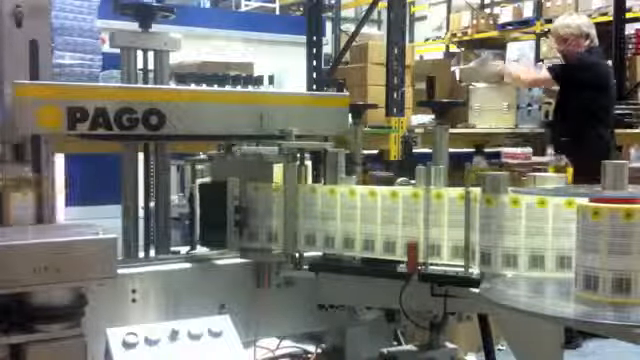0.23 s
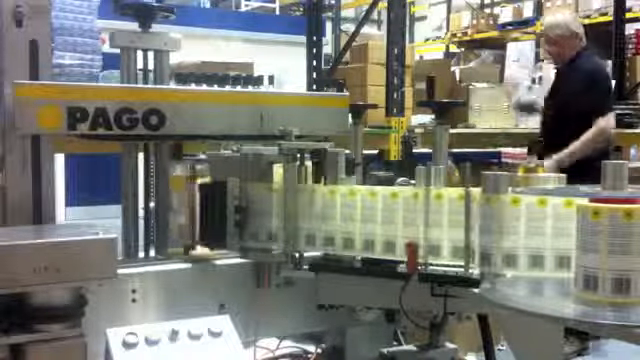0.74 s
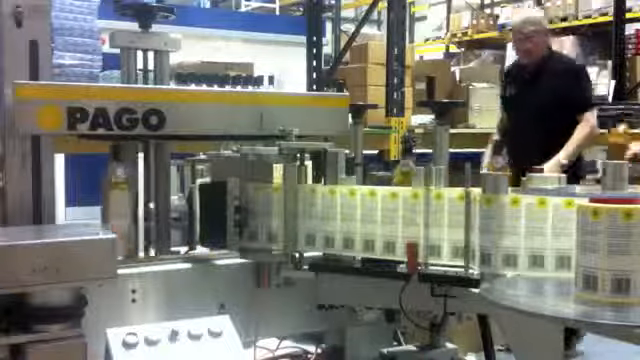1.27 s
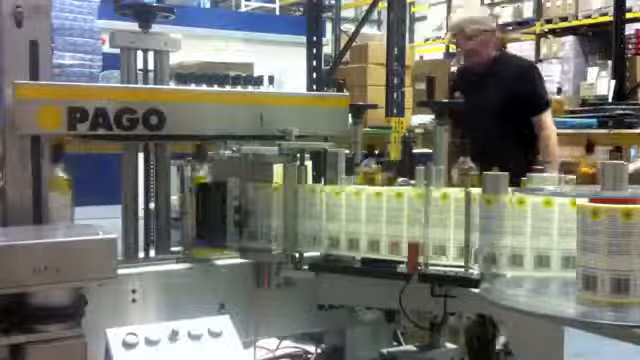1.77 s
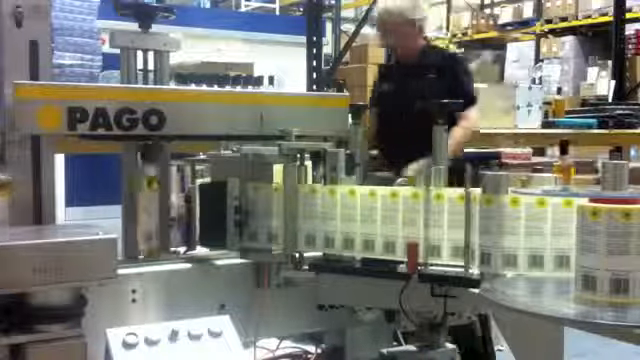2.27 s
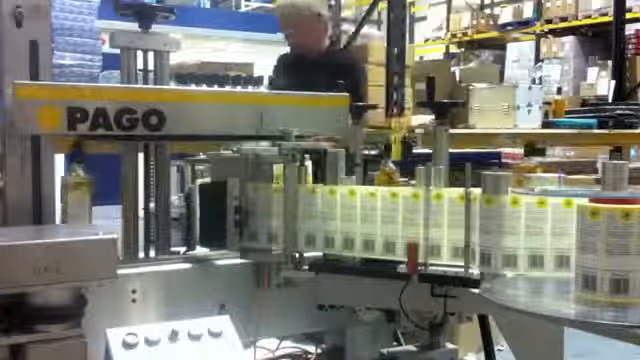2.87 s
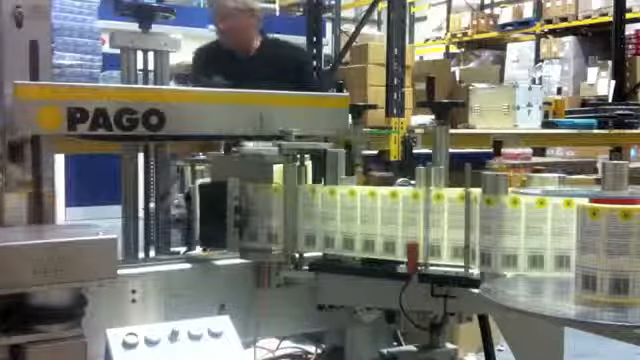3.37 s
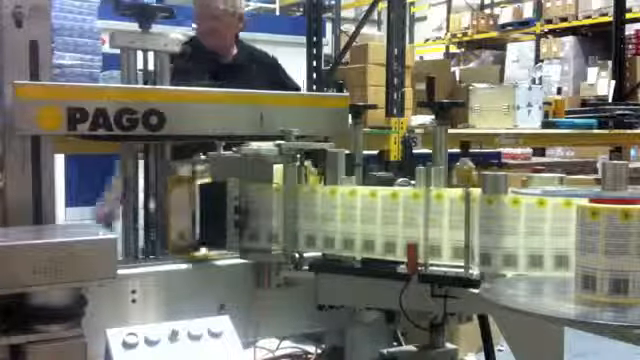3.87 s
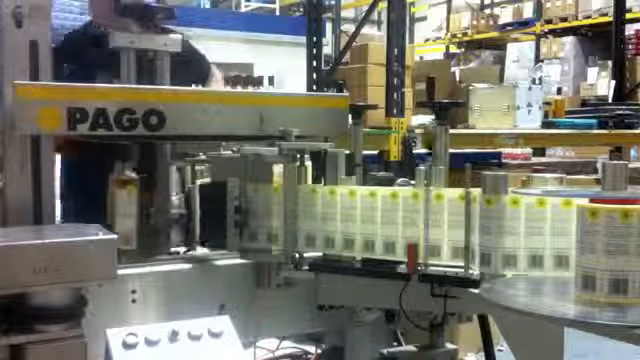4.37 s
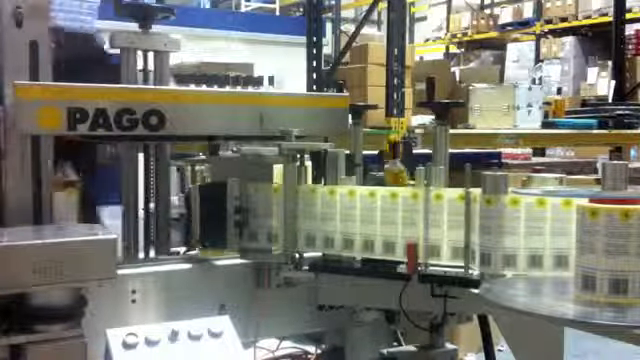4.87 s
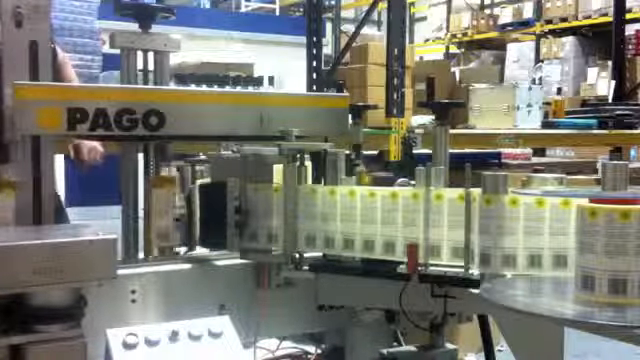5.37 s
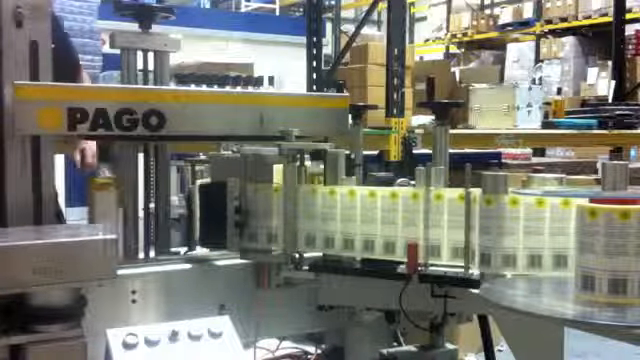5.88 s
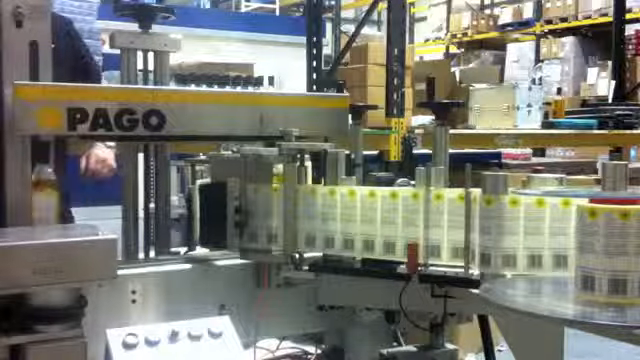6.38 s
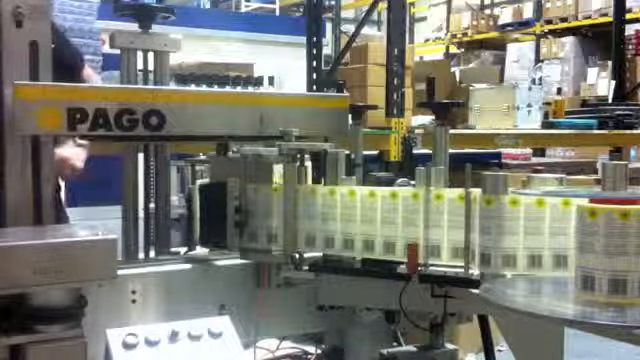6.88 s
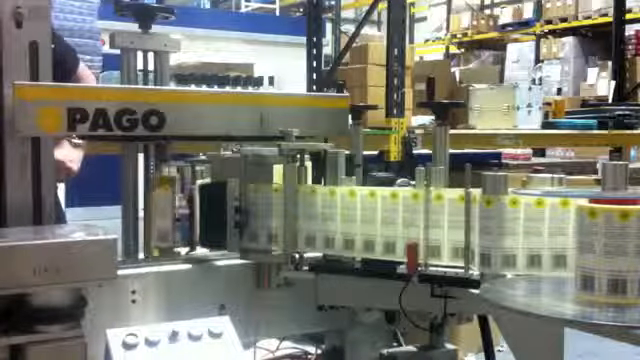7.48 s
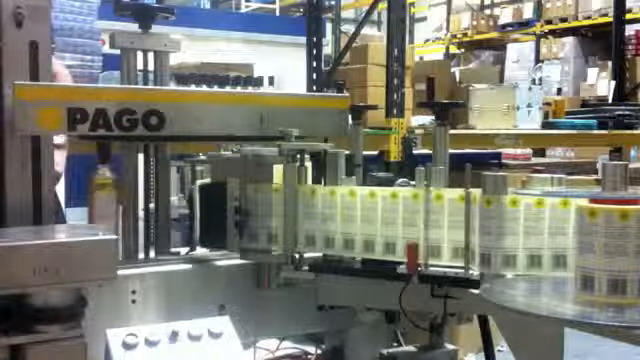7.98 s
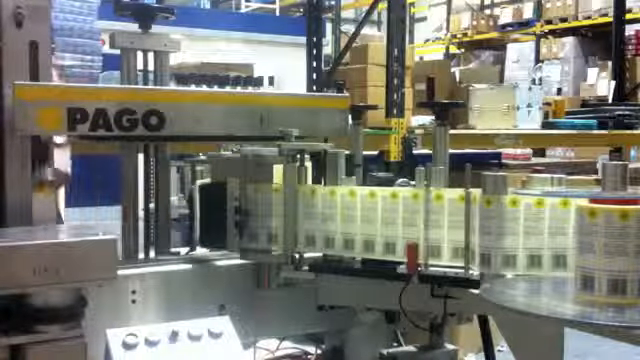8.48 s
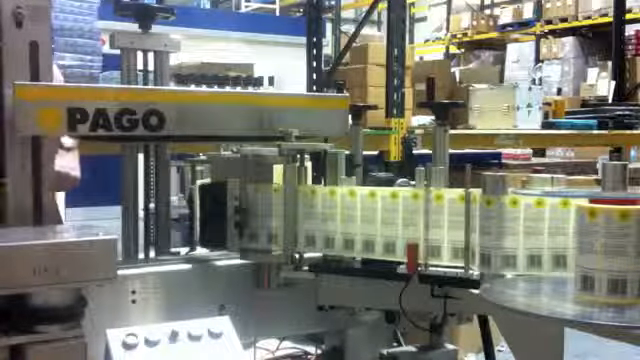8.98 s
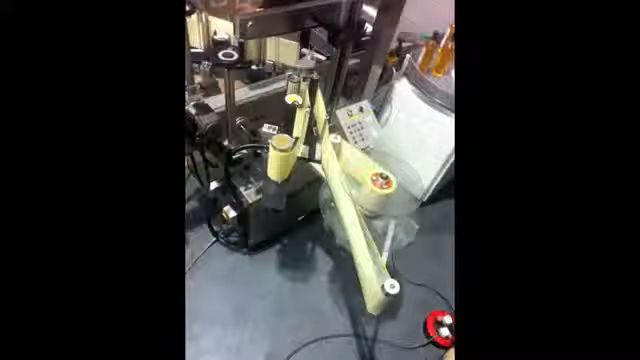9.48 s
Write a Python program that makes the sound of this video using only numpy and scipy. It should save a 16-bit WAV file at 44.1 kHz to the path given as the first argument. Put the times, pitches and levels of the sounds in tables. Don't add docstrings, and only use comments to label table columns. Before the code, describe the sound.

A steady low motor hum and soft machine murmur fill a large hall with short echoes. Near the microphone, glass bottles travel on a chain conveyor, with faint ticks several times a second and brief papery hisses as labels feed. A bottle knocks in loudly around 0.4 s, with clinks following; a dry, bright knock comes at 1.5 s, then a rattling flurry to about 2.2 s. From 2.2 to 5 s it is sparser: light clinks, a ringing knock at 3.3 s, a thump at 3.8 s, a small sharp crack at 4.35 s. From 5.3 s touches gather, with a sharp glass snap at 5.9 s and the hardest knock at 6.5 s. Dull taps and thumps mix in. From 7.4 s, and especially 7.8 to 9.1 s, bottles are moved close by in dense, bright, ringing clatter. A quick fade at about 9.15 s leaves silence.

```python
import sys
import numpy as np
from scipy import signal
from scipy.io import wavfile

SR = 44100
rng = np.random.default_rng(int(sys.argv[2]) if len(sys.argv) > 2 else 0)


def store_pcm(level_fs):
    pcm = np.round(np.clip(level_fs, -1, 1) * 32767).astype(np.int16)
    wavfile.write(sys.argv[1], SR, np.atleast_2d(pcm).T)


def ratio_of_db(decibels):
    return 10 ** (np.asarray(decibels, float) / 20)


N = 429074
FADE_START_S, FADE_END_S = 9.13, 9.182

# height_s, length_s, sliding_db, glass_rattle_db
SHOVES = [(0.033, 0.11, -42, -42), (0.312, 0.35, -42, -42.5), (0.552, 0.18, -43, -39),
          (0.727, 0.24, -35, -38), (0.954, 0.2, -54.5, -44), (1.334, 0.38, -43.5, -47),
          (1.611, 0.16, -39, -29), (1.867, 0.23, -30.5, -26.5), (2.18, 0.12, -39.5, -59),
          (2.538, 0.11, -38, -40), (3.37, 0.18, -36, -35.5), (3.913, 0.35, -37, -41.5),
          (4.446, 0.21, -38, -36.5), (5.188, 0.37, -37, -43), (5.694, 0.22, -41, -36.5),
          (5.92, 0.12, -24.5, -23), (6.097, 0.49, -32.5, -30.5), (6.288, 0.23, -28.5, -28),
          (6.942, 0.85, -40.5, -36), (7.302, 0.23, -30, -30), (7.484, 0.09, -39.5, -26.5),
          (7.594, 0.086, -34.5, -61.5), (7.841, 0.081, -41, -25), (8.034, 0.15, -32, -19),
          (8.43, 0.47, -38.5, -31), (8.618, 0.34, -33, -31), (9.06, 0.12, -37, -33.5)]
# start_s, peak_db, crack_db, tail_t60_s
KNOCKS = [
    (0.434, -9.5, -22, 0.16),
    (1.465, -11, -11, 0.029),
    (3.312, -22.5, -26, 0.22),
    (4.35, -26.5, -14.5, 0.072),
    (6.470, -5.5, -13.5, 0.15),
]


def unit(x):
    return x / np.sqrt(np.mean(x ** 2) + 1e-20)


def drift(rate_hz):
    r = np.exp(-80 * np.pi * rate_hz / SR)
    warm_up = 2000
    white = rng.standard_normal(N // 40 + warm_up + 2)
    slow = signal.lfilter([1], [1, -2 * r, r * r], white)[warm_up:]
    return np.interp(np.arange(N) / 40, np.arange(len(slow)), unit(slow))


def bandpass(x, low_hz, high_hz):
    return signal.sosfilt(signal.butter(2, [low_hz, high_hz], "band", fs=SR, output="sos"), x)


def highpass(x, order, hz):
    return signal.sosfilt(signal.butter(order, hz, "high", fs=SR, output="sos"), x)


def coloured(points, patchy_db):
    edges_hz = 25 * 2 ** np.arange(0, 9.1, .5)
    white = rng.standard_normal((2, N))
    at_hz, level_db = np.transpose(points)
    out = 0
    for k, (low, high) in enumerate(zip(edges_hz, edges_hz[1:])):
        band_db = np.interp(np.log(low * high) / 2, np.log(at_hz), level_db, left=-70)
        out = out + bandpass(white[k % 2], low, high) * ratio_of_db(band_db + patchy_db * drift(29))
    return unit(out)


def train(times_s, sizes):
    return np.bincount((np.asarray(times_s) * SR).astype(int), sizes, N)


def ring(clicks, hz, t60_s):
    r = ratio_of_db(-60 / (t60_s * SR))
    w = 2 * np.pi * hz / SR
    return signal.lfilter([0, np.sin(w)], [1, -2 * r * np.cos(w), r * r], clicks + 1e-18)


def dying(times_s, sizes, t60_s):
    decay = signal.lfilter([1], [1, -ratio_of_db(-60 / (t60_s * SR))], train(times_s, sizes) + 1e-18)
    swell_s = 0.0019
    r = np.exp(-1 / (swell_s * SR))
    return signal.lfilter([1 - r], [1, -r], decay)


def add(out, s, hz, level_db, t60_s, swell_s):
    twin_share, twin_db = 0.017, -10.5
    waver_db, waver_s = 2.4, .012
    start = int(s * SR)
    t = np.arange(int(SR * min(t60_s, 1 / 3))) / SR
    twin_hz = hz * (1 + twin_share * rng.uniform(0.16, 1) * rng.choice([-1, 1]))
    pair = np.sin(2 * np.pi * hz * t) + ratio_of_db(twin_db) * np.sin(2 * np.pi * twin_hz * t)
    uneven_db = waver_db * np.interp(t, np.arange(30) * waver_s, rng.standard_normal(30))
    envelope = ratio_of_db(level_db + uneven_db - 60 * t / t60_s) * (1 - np.exp(-t / swell_s))
    out[start:start + len(t)] += envelope * pair


def contact(times_s, sizes):
    # lag_s, level_db
    chatter = [
        (0, -4.5),
        (.0021, -3),
        (.0055, -12),
    ]
    lag_s, level_db = np.transpose(chatter)
    signs = rng.choice([-1, 1], (len(times_s), len(lag_s)))
    return np.add.outer(times_s, lag_s).ravel(), (np.outer(sizes, ratio_of_db(level_db - 6.0)) * signs).ravel()


def apart(rows):
    return [row for row in rows if min(abs(row[0] - k[0] + .01) for k in KNOCKS) > .02]


def nearness(pitch_hz, hz, per_octave_db, most_db):
    return -np.minimum(per_octave_db * np.abs(np.log2(pitch_hz / hz)), most_db)


def shoved(levels_db, narrow):
    rise_db, fall_db = 20, 13
    s, length_s = np.transpose(SHOVES)[:2, :, None]
    t = np.arange(0, N, 100) / SR
    away = (t - s) / length_s
    db = levels_db[:, None] - narrow * np.maximum(-rise_db * away, fall_db * away)
    total_db = 10 * np.log10(np.sum(ratio_of_db(2 * db), axis=0) + 1e-9)
    return np.interp(np.arange(N) / SR, t, total_db)


def hum():
    # pitch_hz, rms_db
    motor_lines = [(60, -85), (100, -71), (199.7, -50.5), (300, -55), (425, -61), (500, -64), (699, -58),
                   (1100, -78)]
    t = np.arange(N) / SR
    out = 0
    for hz, db in motor_lines:
        phase = 2 * np.pi * hz * t + 0.47 * drift(6.0)
        out = out + np.sqrt(2) * ratio_of_db(db + hz / 300 * drift(23)) * np.sin(phase)
    return out


def hall_noise():
    # pitch_hz, density_db
    murmur = [(18, -68), (30, -33), (144, -14.5), (199, -9), (248, -7.5), (294, -7.5), (341, -8.5),
              (425, -7), (630, -14.5), (695, -15.5), (805, -9.5), (3340, -28), (9850, -36), (10600, -28.5),
              (13800, -73), (22000, -120)]
    return ratio_of_db(-42.5 - 5.5) * coloured(murmur, patchy_db=2.5)


def label_web(slide_db):
    # pitch_hz, density_db
    web_spectrum = [(1500, -4.5), (3000, 4.5), (5000, -6), (8000, -5), (10500, -11)]
    hiss_db = shoved(slide_db, narrow=1.01)
    return ratio_of_db(hiss_db - 9.0 + 1.8 * drift(30)) * coloured(web_spectrum, patchy_db=4.5)


def glass_crack():
    # pitch_hz, density_db
    crack_spectrum = [(180, -55), (300, -22), (932, -9.5), (1500, -8.5), (2320, -3), (2730, -7), (3170, 0),
                      (3460, -5), (5180, -8), (10600, -15), (13800, -48), (22000, -120)]
    return coloured(crack_spectrum, patchy_db=4.0)


def jolts():
    # first_s, peak_db, ring_hz, sharpness_db
    link_jolts = [
        (0.0252, -34.5, 4700, -7),
        (0.113, -42, 2188, -14),
    ]
    link_s, spread_s, spread_db = 0.1571, 0.0044, 2.0
    links_s = np.arange(0, FADE_START_S, link_s)
    chance = rng.standard_normal((len(links_s), len(link_jolts), 2))
    return [(at + s + spread_s * c[0], db + spread_db * c[1], hz, sharp_db)
            for at, row in zip(links_s, chance) for (s, db, hz, sharp_db), c in zip(link_jolts, row)]


def clink_rows():
    # start_s, peak_db, loudest_ring_hz, sharpness_db
    passing = [(0.1535, -30.5, 2420, -5), (0.3294, -28, 2940, -27), (0.5292, -9.5, 2860, -32),
               (0.5305, -11.5, 3325, -26), (0.673, -22.5, 2852, -12), (0.7178, -29, 2100, -9),
               (0.896, -21.5, 2840, -6.5), (0.9594, -24, 2852, -30), (1.2104, -26.5, 2980, -18),
               (1.356, -30, 3010, -20), (1.5094, -24, 2850, -32), (1.5578, -12.5, 2850, -19),
               (1.5794, -13, 2852, -21), (1.6394, -19.5, 2460, -12), (1.7205, -23, 2165, -9),
               (1.8395, -29, 2420, -12), (1.8736, -18, 2410, -8), (1.9494, -28.5, 1960, 5),
               (2.1969, -24, 2800, -20), (2.281, -29, 2420, -11), (2.4404, -33, 2420, -2.5),
               (2.7906, -29.5, 2120, -12), (3.362, -11.5, 3015, -28), (3.377, -21, 2420, -27),
               (3.631, -30.5, 2860, -14), (3.642, -30, 2126, -27), (3.7776, -30.5, 3280, -5.5),
               (3.9093, -29, 3150, -15), (4.0659, -25, 3780, -7), (4.4394, -23.5, 2010, -15),
               (4.5495, -38, 3160, -3), (4.8663, -32, 2223, -7.5), (5.2448, -31, 3140, -2)]
    before_knock = [
        (1.444, -18.5, 2895, -19.5),
    ]
    neighbours = [(0.457, -11, 3490, -18), (2.281, -35, 1822, -30), (2.283, -30, 2126, -30),
                  (2.442, -31.5, 1822, -30), (2.47, -32, 2126, -25), (2.534, -48, 2126, -25),
                  (2.792, -31, 2420, -30), (2.9404, -32.5, 2090, -14), (2.942, -38, 1822, -26.5),
                  (5.996, -15, 3490, -27.5), (6.157, -20.5, 2420, -32.5), (6.219, -18.5, 2852, -23),
                  (7.461, -22, 1746, -33.5), (8.0235, -24, 2905, -24), (8.728, -19.5, 1746, -28),
                  (8.75, -20, 3125, -22), (9.047, -20.5, 1746, -15), (9.089, -21.5, 1746, -28),
                  (9.112, -24.5, 1746, -24.5)]
    nudged = [(5.53, -40, 2223, -32), (5.59, -33, 2223, -30), (5.64, -43, 2126, -27),
              (5.74, -30, 2126, -30), (5.89, -22, 2420, -30), (5.95, -25, 2420, -30),
              (6.005, -16, 2420, -30), (5.7, -29.5, 3230, -30), (3.8, -29, 3230, -30),
              (3.859, -42, 3230, -30), (7.49, -20, 2441, -30), (7.537, -14, 2110, -28),
              (7.839, -19, 1746, -30), (7.896, -29, 1746, -25), (8.059, -16, 3125, -27),
              (8.157, -14, 1746, -30.5), (7.972, -16, 2110, -29), (8.05, -17, 2110, -29),
              (8.107, -14.5, 2110, -27), (8.16, -22, 3125, -30), (8.194, -23, 3125, -24),
              (8.25, -28, 3125, -30), (8.225, -22, 2441, -31), (8.247, -20.5, 1746, -30),
              (8.283, -21.5, 1746, -27), (8.401, -23.5, 1746, -31), (8.51, -25.5, 1746, -33),
              (8.58, -29, 1746, -29.5), (8.639, -26.5, 2441, -32.5), (8.698, -23, 1746, -29),
              (8.839, -25, 1746, -32), (9.11, -27.5, 5275, 3)]
    loading = [(4.7405, -33.5, 2223, -19), (5.011, -35, 2200, -14), (5.5558, -29, 2000, -12),
               (5.338, -31, 2223, -2), (5.391, -26.5, 2420, -4), (5.5, -32.5, 2155, -8),
               (5.7024, -24.5, 2150, -11), (5.802, -26, 2120, 3.5), (5.8163, -15.5, 2060, -23),
               (5.892, -16, 3000, -17), (5.918, -26, 3060, -7), (5.9948, -10.5, 3325, -16),
               (6.085, -17, 2910, -34), (6.1611, -16, 2050, -25), (6.268, -19, 2420, -1.5),
               (6.356, -22, 2940, -30), (6.6077, -20, 3125, -18), (6.759, -28.5, 3125, -5),
               (6.8716, -28.5, 2150, 1.5), (6.967, -22, 3125, -14), (7.135, -32, 1750, 3.5),
               (7.4595, -13.5, 2430, -31), (7.5093, -18, 2100, -8), (7.5594, -29, 2100, -10),
               (7.6036, -19.5, 2094, -5)]
    bunch = [(7.7772, -19, 3570, -1.5), (7.835, -9, 3130, -19), (7.9572, -16, 1760, -34),
             (7.9998, -14, 2110, -9), (8.038, -8.5, 3125, -7.5), (8.108, -15.5, 1723, -5),
             (8.1981, -15, 2110, -20), (8.3811, -15, 1710, -18), (8.5665, -14.5, 2085, -12),
             (8.6202, -18, 2440, -19), (8.6974, -13, 3110, -15), (8.7253, -10, 3130, -12.5),
             (8.9595, -25, 4230, 1.5), (9.02, -27, 2905, -8.5), (9.0891, -16, 3130, -8.5)]
    return sorted(passing + loading + bunch + before_knock + neighbours + nudged + apart(jolts()))


def shards(clicks):
    at = np.flatnonzero(clicks)
    pitches_hz = np.geomspace(3700, 10200, 22) * rng.uniform(.98, 1.02, 22)
    uneven = rng.standard_normal((len(at), 22)) * ratio_of_db(5 * rng.standard_normal((len(at), 22)) - 3)
    return sum(ring(train(at / SR, clicks[at] * size), hz, 300 / hz) * (4000 / hz) ** 0.18
               for hz, size in zip(pitches_hz, uneven.T))


def crowd(times_s, sizes):
    level_db, t60_cycles = -26, 126
    pitches_hz = np.geomspace(1900, 3700, 18) * rng.uniform(.985, 1.015, 18)
    uneven = np.clip(rng.standard_normal((len(times_s), 18)), -1.6, 1.6)
    return ratio_of_db(level_db) * sum(ring(train(times_s, sizes * size), hz, t60_cycles / hz)
                               for hz, size in zip(pitches_hz, uneven.T))


def glass(crack, rattle_db):
    early_hz = [950, 1822, 2062, 2126, 2223, 2420, 2852, 3015, 3230, 3325, 3490, 4300, 4620, 5263, 6212]
    late_hz = [1016, 1746, 2046, 2110, 2223, 2441, 2905, 3125, 3340, 3600, 4300, 4943, 5275, 6150]
    # level_db, t60_s
    early_walls = [(-4, 0.053), (-3, 0.12), (-4, 0.1), (-8.5, 0.13), (-15, 0.1), (-3.5, 0.099),
                   (-8.5, 0.087), (-3.5, 0.051), (-9, 0.11), (-13, 0.073), (-4.5, 0.041), (-11.5, .07),
                   (-11, 0.044), (-10.5, 0.051), (-19.5, 0.042)]
    late_walls = [(-13.5, 0.076), (-7, 0.21), (-6, 0.14), (-7.5, 0.1), (-13.5, 0.17), (-5.5, 0.15),
                  (-4, 0.028), (-6.5, 0.091), (-8.5, 0.088), (-18.5, 0.18), (-25.5, 0.072), (-13.5, 0.074),
                  (-8, 0.032), (-30.5, .05)]
    change_s = 6.45
    s, peak_db, pitch_hz, sharp_db = np.transpose(clink_rows())
    bright = highpass(crack, 2, 2600)
    out = bright * dying(s, ratio_of_db(peak_db + sharp_db - 8), .14)

    at = np.flatnonzero(rng.random(N) < 420 * ratio_of_db(5 * drift(25)) / SR)
    touches = ratio_of_db(rattle_db[at] + 1.95 * np.minimum(rng.exponential(1, len(at)), 4))
    hard = peak_db > -32
    last_hard = np.maximum(np.searchsorted(s[hard], at / SR) - 1, 0)
    rattling_hz = pitch_hz[hard][last_hard]
    clink_clicks = train(*contact(s, ratio_of_db(peak_db + sharp_db - 18.0)))
    out += shards(clink_clicks + train(at / SR, ratio_of_db(-36) * touches))
    out += crowd(np.r_[s, at / SR], np.r_[ratio_of_db(peak_db + 3.0), ratio_of_db(-3.0) * touches])

    for pitches_hz, modes, late in ((early_hz, early_walls, False), (late_hz, late_walls, True)):
        mine = (s > change_s) == late
        near = touches * ((at > change_s * SR) == late)
        for start_s, db, hz in zip(s[mine], peak_db[mine], pitch_hz[mine]):
            k = np.argmin(np.abs(hz - np.array(pitches_hz)))
            add(out, start_s, pitches_hz[k], db - 6.5, modes[k][1], swell_s=0.006)
        for hz, (db, t60_s) in zip(pitches_hz, modes):
            chance = np.clip(rng.standard_normal(len(s)), -1, 1)
            stirred = ratio_of_db(peak_db + db - 3.5 + nearness(pitch_hz, hz, 40, 22.0)) * mine * chance
            rain = ratio_of_db(db - 11 + nearness(rattling_hz, hz, 59.5, 3.53)) * near * rng.standard_normal(len(at))
            out += ring(train(*contact(s, stirred)) + train(at / SR, rain), hz, t60_s)
    return out


def bed(slide_db):
    # start_s, peak_db, pitch_hz
    thumps = [(0.431, -27, 894), (0.515, -27, 1250), (0.614, -22, 235), (0.622, -24, 465),
              (0.636, -27.5, 720), (0.751, -26, 494), (1.211, -27.5, 1300), (1.357, -28.5, 1250),
              (1.465, -9, 899), (1.795, -23.5, 292), (1.839, -16, 660), (1.877, -14.5, 920),
              (2.519, -28, 955), (3.312, -25, 869), (3.771, -17, 770), (3.79, -24, 261), (3.908, -26, 463),
              (4.348, -20, 886), (5.109, -20.5, 267), (5.241, -25, 486), (5.811, -28, 955),
              (5.88, -22, 697), (6.103, -16.5, 646), (6.21, -20, 664), (6.298, -32.5, 620),
              (6.352, -16, 930), (6.473, -25, 651), (6.601, -20, 640), (6.876, -24.5, 725),
              (7.507, -19.5, 1056), (7.54, -25, 1050), (8.001, -22.5, 1030)]
    # pitch_hz, width_hz, level_db
    bed_modes = [(240, 84, -15.5), (432, 17, -5.5), (638, 170, 2.5), (1145, 460, 12)]
    s, peak_db, pitch_hz = np.transpose(apart(thumps))
    out = 0
    for hz, width_hz, db in bed_modes:
        signs = rng.choice([-1, 1], len(s))
        out = out + ring(train(s, ratio_of_db(peak_db + db - 13.5) * signs), hz, 2.1 / width_hz)
    out = signal.lfilter([.12], [1, -.88], out)
    for start_s, db, hz in zip(s, peak_db, pitch_hz):
        add(out, start_s, hz, db - 11, 50 / hz, swell_s=0.0012)
    rumble_db = np.maximum(shoved(slide_db, narrow=0.67), -48)
    feet = rng.standard_normal(N) * ratio_of_db(2.4 * drift(40))
    shaken = sum(ratio_of_db(db) * unit(ring(feet, hz, 0.99 / width_hz)) for hz, width_hz, db in bed_modes)
    return out + ratio_of_db(rumble_db - 7.0) * unit(shaken)


def knocks(crack):
    # pitch_hz, level_db, t60_s
    pair_a = [(1330, -21, 0.15), (1830, -10, 1.6), (2126, -11, 0.36), (2460, -14, 0.2), (2864, -11, 0.27),
              (2955, -13, 0.32), (3284, 0, 0.099), (3946, -26, 0.4), (4075, -45, 5.0), (4942, -21, 0.18),
              (5243, -23, 5.0), (6412, -22, 0.12), (6767, -29, 0.28)]
    pair_b = [(900, -25, 0.5), (1803, -16, 1.0), (2040, -19, 0.28), (2390, -7, 0.5), (2853, 0, 0.42),
              (3090, -4, 0.19), (3327, -2, 0.21), (4301, -23, 0.32), (4484, -14, 0.16), (4947, -13, 0.11),
              (5265, -25, 0.5), (6207, 0, 0.055), (6988, -16, 0.087)]
    pair_c = [(953, -3, 0.1), (1846, -20, 5.0), (2110, -8, 2.3), (2412, -4, 0.17), (2955, -4, 0.23),
              (3343, -20, 1.4), (3644, -6, 0.22), (4253, -4, 0.13), (4613, -21, 0.36), (5206, -17, 0.12),
              (5905, -21, 0.54), (6686, -17, 0.19)]
    pair_d = [(980, -17, .1), (1120, -12, 0.08), (1841, -11, 5.0), (2099, -1, 0.19), (2218, -3, 0.083),
              (2519, 0, 0.15), (2896, -1, 0.3), (3133, -34, 5.0), (3381, -14, 1.7), (4037, -4, 0.2),
              (4258, -5, 0.19), (5857, -12, 0.16)]
    pair_e = [(1744, -20, 0.4), (2046, 0, 0.058), (2126, -15, 0.62), (2223, -10, 0.61), (2385, -22, 5.0),
              (2444, -3, 0.65), (2842, -26, 3.1), (3138, -3, 0.12), (3569, -12, 0.14), (3919, -22, 0.33),
              (4307, -16, 0.17), (4560, -17, 0.23), (5286, -12, 0.17)]
    rebounds_s = [0, .011, .024, .043]
    out = np.zeros(N)
    for (s, peak_db, crack_db, tail_s), modes in zip(KNOCKS, (pair_a, pair_b, pair_c, pair_d, pair_e)):
        for hz, db, t60_s in modes:
            level_db = peak_db + db
            add(out, s + .001 * rng.random(), hz, level_db - 3.5, min(t60_s, 650 / hz), swell_s=0.0049)
            other_s, other_hz = s + 0.00307 * rng.random(), hz * rng.uniform(1.0, 1.03)
            add(out, other_s, other_hz, level_db - 9.5, min(t60_s, 300 / hz), swell_s=0.0024)
        out += crack * dying([s], [ratio_of_db(crack_db)], tail_s)
    s, peak_db, crack_db, _ = np.transpose(KNOCKS)
    again_s = np.add.outer(s, rebounds_s).ravel()
    out += crowd(again_s, np.repeat(ratio_of_db(peak_db + 2.0), len(rebounds_s)))
    return out + shards(train(*contact(s, ratio_of_db(crack_db - 10.0))))


def snaps(crack):
    # start_s, peak_db, brightest_hz
    early_snaps = [(0.5154, -33, 4950), (0.8129, -39, 4650), (0.8969, -31, 4000), (1.1268, -32, 4270),
                   (1.21, -39, 4470), (1.721, -32, 6320), (1.7883, -20.5, 4440), (1.8392, -24, 5400),
                   (1.872, -26, 4620), (1.9939, -22.5, 5220), (2.1549, -23, 4100), (2.4399, -37, 4090),
                   (2.5401, -31, 5330), (2.6998, -29, 4570), (2.8569, -37, 4640), (3.7838, -41, 4410),
                   (3.9115, -36, 6630), (4.0602, -29, 4100), (4.2692, -34, 4330), (4.742, -28, 4660),
                   (5.0589, -36, 4210), (5.2429, -37, 4220), (5.3393, -38, 5140), (5.685, -31, 4080)]
    late_snaps = [(5.7817, -29, 3800), (5.8032, -33, 4240), (5.885, -29, 4930), (5.9192, -10, 5470),
                  (5.9948, -33, 3900), (6.1578, -23, 4110), (6.2173, -38, 8490), (6.2662, -21, 4630),
                  (6.4702, -5, 5260), (6.7595, -35, 4650), (6.8743, -21, 5350), (6.9381, -27, 5300),
                  (7.014, -31, 3800), (7.0589, -27, 3910), (7.1016, -39, 4510), (7.1317, -34, 5900),
                  (7.1517, -22, 4260), (7.209, -30, 4600), (7.3126, -24, 4000), (7.3841, -41, 5450),
                  (7.4574, -17.5, 4700), (7.4959, -30, 4770), (7.564, -18, 7300), (7.6106, -22, 5350),
                  (7.7418, -22, 7600), (7.7772, -33, 5350), (7.833, -12, 6540), (7.898, -28, 4850),
                  (7.951, -30, 4940), (7.9778, -18, 4790), (7.993, -12.5, 5260), (8.0237, -19, 4540),
                  (8.104, -31, 4630), (8.1584, -29, 5840), (8.1923, -24, 5750), (8.2821, -25, 5880),
                  (8.3754, -34, 5770), (8.3978, -23, 5130), (8.4377, -18, 4900), (8.508, -33, 5300),
                  (8.546, -32, 4750), (8.567, -29, 4370), (8.6832, -29, 4340), (8.726, -35, 5310),
                  (8.8214, -29.5, 4010), (8.8405, -20, 4930), (8.9608, -26, 4260), (9.0152, -35, 4320),
                  (9.0354, -18, 4500), (9.0882, -18.5, 5270)]
    burst_t60_s, tail_t60_s, tail_db, uneven_spread_db = 0.01, 0.093, -10, 2.5
    s, peak_db, pitch_hz = np.transpose(apart(early_snaps + late_snaps))
    edges_hz = np.geomspace(3500, 10800, 7)
    uneven_db = uneven_spread_db * rng.standard_normal((len(s), 6))
    out = 0
    for low, high, own_db in zip(edges_hz, edges_hz[1:], uneven_db.T):
        sizes = ratio_of_db(peak_db - 7.0 + own_db + nearness(pitch_hz, np.sqrt(low * high), 25, 7.9))
        envelope = dying(s, sizes, burst_t60_s) + dying(s, sizes * ratio_of_db(tail_db), tail_t60_s)
        out = out + unit(bandpass(crack, low, high)) * envelope
    return out


def taps():
    # start_s, peak_db
    rail_taps = [
        (0.755, -20),
        (1.841, -18),
        (3.911, -22),
        (5.244, -19),
        (6.876, -11),
        (8.727, -15),
    ]
    s, peak_db = np.transpose(rail_taps)
    return signal.lfilter([1], [1, -.75], train(s, ratio_of_db(peak_db)))


def hall(x):
    t60_s = 0.27
    t = np.arange(int(.9 * SR)) / SR
    tail = rng.standard_normal((2, len(t))) * (t > .006)
    low = signal.lfilter([.3], [1, -.7], tail[0]) * ratio_of_db(-60 * t / t60_s)
    high = 0.34 * tail[1] * ratio_of_db(-60 * t / (.5 * t60_s))
    echo = low + high
    return signal.fftconvolve(x, echo / np.sqrt(np.sum(echo ** 2)))[:N]


def scene():
    slide_db, glass_db = np.transpose(SHOVES)[2:]
    crack = glass_crack()
    line = glass(crack, shoved(glass_db, narrow=1)) + bed(slide_db) + knocks(crack) + snaps(crack) + taps()
    line = highpass(line, 3, 251)
    wet = ratio_of_db(-7.5) * hall(line)
    return (hum() + hall_noise() + label_web(slide_db) + line + wet)[None]


def band_limit(x):
    return signal.sosfilt(signal.butter(12, 11710, fs=SR, output="sos"), x)


def record(dry):
    rounded = 1.116 * np.tanh(dry / 1.06)
    cut = signal.sosfilt(signal.cheby2(12, 55, 11210, fs=SR, output="sos"), rounded)
    fade = np.interp(np.arange(N) / SR, [FADE_START_S, FADE_END_S], [1, 0])
    return band_limit(cut * fade)


dry = scene()
out = record(dry)
store_pcm(out)
```